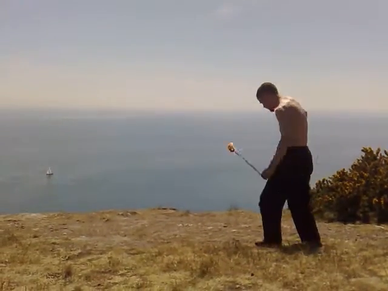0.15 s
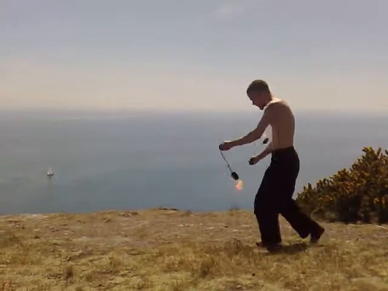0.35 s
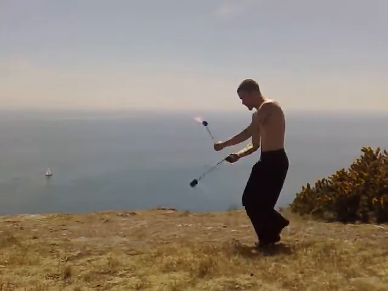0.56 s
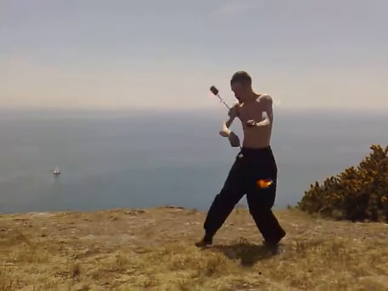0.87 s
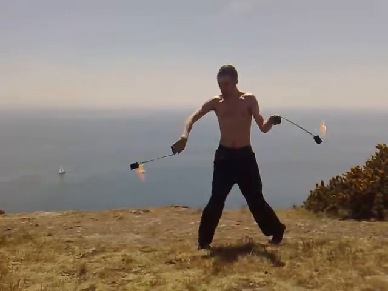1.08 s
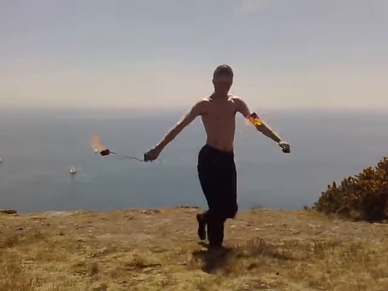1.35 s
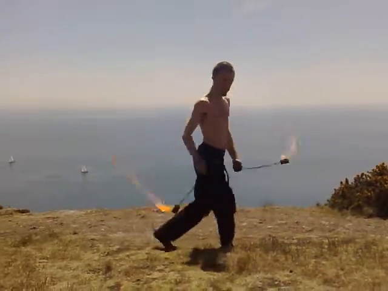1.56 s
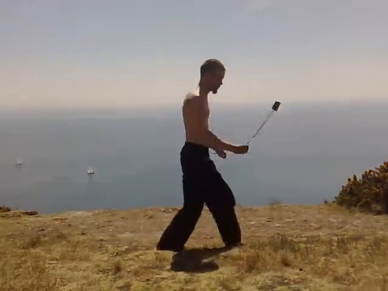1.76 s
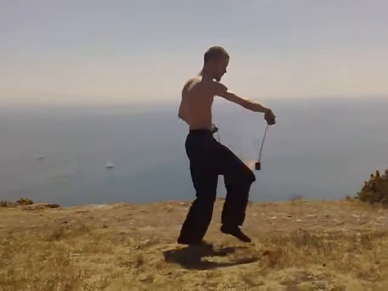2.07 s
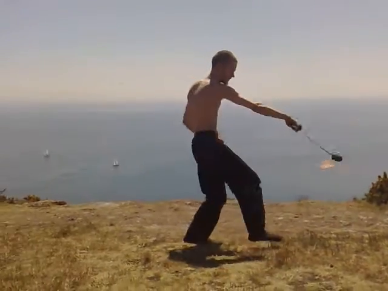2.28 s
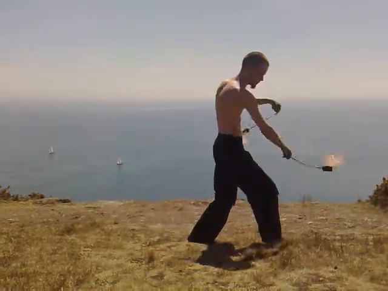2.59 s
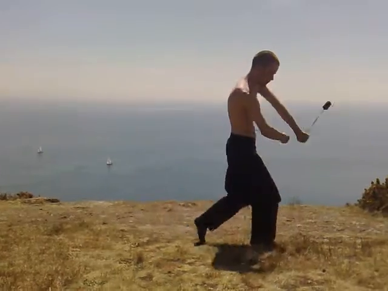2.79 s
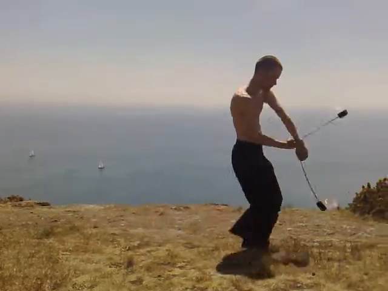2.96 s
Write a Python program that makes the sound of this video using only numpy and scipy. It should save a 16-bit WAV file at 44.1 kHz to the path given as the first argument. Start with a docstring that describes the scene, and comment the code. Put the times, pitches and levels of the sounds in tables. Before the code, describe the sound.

Fire swung on chains roars in torn, fluttering whooshes: low rumble and hollow roar from the start, a lull near 0.6 s, then a flap, puffs and short breathy whistles around 0.7 s. A bright rush peaks near 1.15 s, fades by 1.6, surges at 1.8-1.95 with a tiny spit, weakens around 2.6, and rushes again at 2.9, flapping at 3.1. Low wind and faint hiss continue throughout, outdoors.

```python
"""A windy clifftop, where two burning wicks are swung on chains a few metres from the microphone.
The torn flames are bands of turbulent noise: a rumble, a hollow roar and, at speed, a bright rush, the roar and
rush fluttering together. They flare in puffs of noise and flap in soft pressure pulses; wavering tones whistle
briefly and a noise burst spits once. All but the flaps bounce off the ground.
Wind noise rumbles on the microphone over a faint hiss."""
import sys
import numpy as np
from scipy import signal
from scipy.fft import rfft, irfft
from scipy.io import wavfile
from scipy.ndimage import uniform_filter1d

SR = 44100
rng = np.random.default_rng(int(sys.argv[2]) if len(sys.argv) > 2 else 0)


def to_wav(s):
    """Save 16-bit WAV."""
    ch = np.atleast_2d(s).T  # columns
    pcm = np.round(np.clip(ch, -1, 1) * 32767)  # PCM
    wavfile.write(sys.argv[1], SR, pcm.astype(np.int16))


N = 138033
TIME = np.arange(N) / SR


def from_db(db):
    """Turn decibels into an amplitude gain."""
    return 10 ** (np.asarray(db) / 20)


def rms_one(x):
    """Scale to unit rms."""
    return x / np.sqrt(np.mean(x ** 2) + 1e-20)


def in_time(rows):
    """Draw each column of a table, after its times, as straight lines in time."""
    times, *columns = np.transpose(rows)
    return [np.interp(TIME, times, column) for column in columns]


def drift(rate_hz):
    """Smooth random wandering of rms 1: white noise whose spectrum falls to half amplitude at rate_hz."""
    hz = np.arange(N // 2 + 1) * SR / N
    spectrum = rfft(rng.standard_normal(N)) / (1 + (hz / rate_hz) ** 2)
    return rms_one(irfft(spectrum, N))


def noise(colour):
    """Noise of rms 1 with a given spectrum, falling away 12 dB per octave beyond its end points."""
    hz = np.maximum(np.arange(N // 2 + 1) * SR / N, 1)
    points, db = np.transpose(colour)
    skirts = np.minimum(1, np.minimum(hz / points[0], points[-1] / hz)) ** 2
    gain = from_db(np.interp(np.log(hz), np.log(points), db))
    return rms_one(irfft(rfft(rng.standard_normal(N)) * skirts * gain, N))


def eddies(colour, even_s, rough_db, rough_hz):
    """Turbulent noise: steady in strength over even_s, rough on a finer scale."""
    rough = noise(colour) * from_db(rough_db * drift(rough_hz))
    width = max(int(even_s * SR), 2)
    power = uniform_filter1d(uniform_filter1d(rough ** 2, width), width)
    return rough / np.sqrt(power + 1e-12)


def swell(s, half_s):
    """A bell-shaped (Gaussian) swell around one moment; half_s is its standard deviation."""
    return np.exp(-.5 * ((TIME - s) / half_s) ** 2)


def hiss():
    """A faint, steady hiss: coloured noise at a fixed level."""
    # colour of the hiss: f/Hz, relative level/dB per Hz
    hiss_colour = [(300, 20.5), (2000, -4.5), (4000, 3.5), (6000, 3), (10000, -0.5), (13000, 1), (16000, 3)]
    level_db = -63.5
    return from_db(level_db) * noise(hiss_colour)


def wind():
    """Lumpy buffeting at the microphone: low noise whose level wanders slowly."""
    # colour of the wind: f/Hz, relative level/dB per Hz
    wind_colour = [(15, -18), (40, -14), (90, 0), (200, 1.5), (400, -38)]
    middle_db, wander_db, wander_hz = -53.5, 2.0, 4.3
    return from_db(middle_db + wander_db * drift(wander_hz)) * noise(wind_colour)


def spit():
    """One sharp crackle of burning fuel: a very short burst of band-limited noise."""
    level_db, band_hz = -36, (2300, 5000)
    moment_s, half_s = 1.8935, 0.00044
    band = signal.butter(3, band_hz, "band", fs=SR, output="sos")
    crackle = rms_one(signal.sosfilt(band, rng.standard_normal(N)))
    return from_db(level_db) * swell(moment_s, half_s) * crackle


def whistles():
    """A wick or chain whistles: short, breathy edge tones that waver in pitch and strength."""
    # the whistles: t/s, middle f/Hz, middle level/dB, half length/s
    whistle_rows = [(0.01, 2550, -58.5, 0.0097), (0.327, 4110, -57, 0.018), (0.687, 988, -48, 0.023),
                    (0.701, 2810, -44, 0.014), (1.723, 2740, -50.5, 0.0083)]
    pitch_waver, pitch_rate_hz = 0.029, 410  # waver as an rms share of the pitch
    level_waver_db, level_rate_hz = 3.1, 120
    out = np.zeros(N)
    for s, hz, db, half_s in whistle_rows:
        pitch_hz = hz * (1 + pitch_waver * drift(pitch_rate_hz))
        phase = 2 * np.pi * np.cumsum(pitch_hz) / SR
        level = from_db(db + level_waver_db * drift(level_rate_hz))
        out += level * swell(s, half_s) * np.sin(phase)
    return out


def flares():
    """A tongue of flame flares with a brief puff of turbulence, a little over an octave wide."""
    # the puffs: t/s, centre f/Hz, level/dB (rms under the swell), half length/s
    flare_rows = [(0.705, 2940, -51, 0.011), (0.805, 267, -36, 0.011), (0.847, 2260, -47.5, 0.0069),
                  (0.922, 3320, -52.5, 0.0064), (1.233, 3000, -49.5, 0.006), (1.44, 320, -41.5, 0.0066),
                  (1.913, 360, -37, 0.0094), (2.276, 378, -35.5, 0.0052), (2.696, 810, -41, 0.0044)]
    spread = 1.5  # band edges as a ratio to the centre
    out = np.zeros(N)
    for s, hz, db, half_s in flare_rows:
        band = signal.butter(4, [hz / spread, hz * spread], "band", fs=SR, output="sos")
        puff = signal.sosfilt(band, rng.standard_normal(N))
        bell = swell(s, half_s)
        puff_rms = np.sqrt(np.average(puff ** 2, weights=bell ** 2))
        out += from_db(db) * bell * puff / puff_rms
    return out


def flaps():
    """The flame flaps: one soft push of pressure with a suction on either side."""
    # the flaps: t/s, peak level/dB, half width/s (peak to zero crossing)
    flap_rows = [(0.0904, -28, 0.0015), (0.3612, -29.5, 0.0019), (0.721, -23.5, 0.00146),
                 (1.087, -35, 0.0014), (1.232, -24, 0.0013), (1.4406, -24.5, 0.0011),
                 (1.614, -31.5, 0.0024), (1.8842, -25, 0.0011), (2.001, -27, 0.0025), (2.013, -29, 0.0024),
                 (2.268, -26, 0.00077), (2.377, -27.5, 0.0013), (2.548, -30.5, 0.002),
                 (3.0859, -22, 0.0015)]
    out = np.zeros(N)
    for s, db, half_s in flap_rows:
        push = 1 - ((TIME - s) / half_s) ** 2
        out += from_db(db) * push * swell(s, half_s)
    return out


def flames():
    """Large eddies rumble, smaller ones roar, rush and sizzle; the smaller ones flutter together."""
    # the swings, heard as the level of the rumble: t/s, level/dB before trim
    rumble_level = [(0.0, -43), (0.06, -32), (0.16, -41), (0.19, -34), (0.35, -42), (0.37, -37), (0.5, -42),
                    (0.6, -50.5), (0.64, -36), (0.73, -36), (0.83, -42.5), (0.89, -36), (0.98, -37),
                    (1.09, -34), (1.41, -42.5), (1.44, -37.5), (1.52, -47), (1.71, -39.5), (1.79, -31.5),
                    (1.83, -36.5), (1.89, -32), (2.0, -34), (2.13, -38), (2.25, -39), (2.27, -34),
                    (2.41, -40), (2.53, -45.5), (2.61, -45.5), (2.88, -38), (2.89, -33), (2.95, -39.5),
                    (3.02, -35.5), (3.05, -45), (3.09, -32.5), (3.13, -39)]
    # the roar: t/s, low roar level/dB before trim, hollow roar level/dB before trim
    roar_levels = [(0.0, -43.5, -44), (0.055, -49, -45.5), (0.08, -40.5, -52), (0.14, -51, -48.5),
                   (0.17, -42, -54.5), (0.21, -43.5, -46.5), (0.48, -49, -53.5), (0.58, -58, -67),
                   (0.64, -48, -54.5), (0.68, -47.5, -45.5), (0.72, -41.5, -50), (0.77, -48.5, -49),
                   (0.81, -45, -50.5), (0.85, -40.5, -47), (0.9, -46.5, -46), (1.13, -41.5, -44.5),
                   (1.34, -47, -47), (1.39, -53.5, -51.5), (1.5, -52.5, -52), (1.57, -64, -59),
                   (1.8, -43, -45.5), (1.93, -38, -45.5), (2.07, -46, -46), (2.24, -52.5, -43),
                   (2.29, -41.5, -45.5), (2.52, -55, -60.5), (2.54, -48.5, -54), (2.63, -62.5, -54.5),
                   (2.72, -58.5, -48), (2.88, -50, -51), (2.92, -39, -47), (3.01, -46, -48.5),
                   (3.13, -49.5, -43.5)]
    # the rush, which opens at the fastest moments: t/s, level/dB before trim
    rush_level = [(0.0, -51), (0.16, -64), (0.18, -53), (0.29, -49.5), (0.43, -65), (0.45, -62.5),
                  (0.57, -68.5), (0.72, -48.5), (0.77, -52.5), (0.79, -50.5), (0.92, -48.5), (1.09, -51),
                  (1.15, -43.5), (1.64, -67), (1.78, -47.5), (1.91, -44), (2.09, -55), (2.11, -53),
                  (2.19, -55.5), (2.24, -51), (2.45, -58.5), (2.51, -68), (2.54, -58.5), (2.59, -69),
                  (2.64, -59), (2.895, -59.5), (2.925, -44), (2.955, -44.5), (2.99, -56), (3.05, -50.5),
                  (3.13, -59)]
    # the treble sizzle: t/s, level/dB
    sizzle_level = [(0.0, -56), (0.02, -57), (0.06, -65), (0.33, -55), (0.36, -69.5), (0.6, -69.5),
                    (0.62, -59), (0.67, -64), (0.68, -53.5), (0.71, -54), (0.76, -58), (0.8, -50.5),
                    (1.1, -54.5), (1.13, -46.5), (1.2, -51.5), (1.33, -55), (1.39, -65.5), (1.44, -52.5),
                    (1.46, -63), (1.65, -69), (1.73, -51), (1.74, -56), (1.88, -46.5), (1.91, -50),
                    (2.09, -63.5), (2.12, -56.5), (2.18, -61.5), (2.25, -57.5), (2.46, -63), (2.48, -68.5),
                    (2.81, -64.5), (2.88, -68.5), (2.94, -51.5), (2.99, -56.5), (3.13, -57.5)]
    # colours of the five layers, from large eddies to small: f/Hz, relative level/dB per Hz
    rumble_colour = [(15, -24), (28, -18), (45, -5), (70, -3), (110, -1), (165, -2.5), (215, -4.5),
                     (275, -18), (400, -44)]
    low_colour = [(170, -13), (250, 3.5), (320, -2), (420, -4.5), (560, -10), (720, -25.5)]
    hollow_colour = [(430, -5.5), (560, -2.5), (660, 2.5), (850, 0), (1060, 2), (1200, -8.5), (1500, -18)]
    rush_colour = [(850, -23), (1200, 4), (1550, 2.5), (1950, 2), (2400, -5.5), (3000, -51)]
    sizzle_colour = [(1900, -8), (2600, 2.5), (3300, -3.5), (4100, -4.5), (4700, -10.5), (5500, -20),
                     (7000, -26), (12000, -32)]
    rumble_trim_db, low_trim_db, hollow_trim_db, rush_trim_db = -0.5, 1.5, 0.5, 0.5
    flutter_hz, flutter_db = 67.3, 2
    flutter_span_s = 0.2  # slower wandering is taken out of the flutter

    rumble_db, = in_time(rumble_level)
    low_db, hollow_db = in_time(roar_levels)
    rush_db, = in_time(rush_level)
    sizzle_db, = in_time(sizzle_level)

    rumble = from_db(rumble_db + rumble_trim_db) * eddies(rumble_colour, even_s=0.022, rough_db=2.0, rough_hz=40)
    low = from_db(low_db + low_trim_db) * eddies(low_colour, even_s=0.03, rough_db=1.5, rough_hz=70.4)
    hollow = from_db(hollow_db + hollow_trim_db) * eddies(
        hollow_colour, even_s=0.022, rough_db=1.26, rough_hz=60.0)
    rush = from_db(rush_db + rush_trim_db) * eddies(rush_colour, even_s=0.041, rough_db=1.5, rough_hz=80)
    sizzle = from_db(sizzle_db) * eddies(sizzle_colour, even_s=0.015, rough_db=1.4, rough_hz=120)

    wander = drift(flutter_hz)
    slow = uniform_filter1d(wander, max(int(flutter_span_s * SR), 2))
    flutter = rms_one(wander - slow)
    flutter_gain = rms_one(from_db(flutter_db * np.tanh(flutter)))  # tanh bounds the swing
    return rumble + (low + hollow + rush + sizzle) * flutter_gain


def ground_bounce(x):
    """The direct sound plus a weaker, slightly later reflection, scaled to keep about the same power."""
    delay_s, share = 0.001203, 0.13
    reflection = share * np.interp(TIME - delay_s, TIME, x)
    return (x + reflection) / np.sqrt(1 + share ** 2)


def scene():
    """Fire above the ground, wind and hiss, in mono."""
    fire = ground_bounce(flames() + flares() + whistles() + spit()) + flaps()
    return (fire + wind() + hiss())[None]


def record(dry):
    """The top is cut steeply by an elliptic low-pass."""
    cutoff_hz, ripple_db, stop_db = 15750, .1, 70
    low_pass = signal.ellip(12, ripple_db, stop_db, cutoff_hz, fs=SR, output="sos")
    return signal.sosfilt(low_pass, dry)


dry = scene()
out = record(dry)
to_wav(out)
```